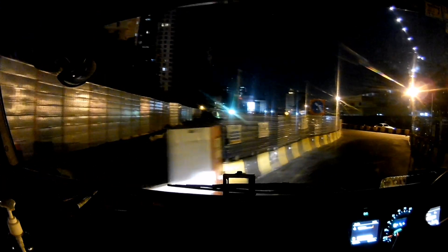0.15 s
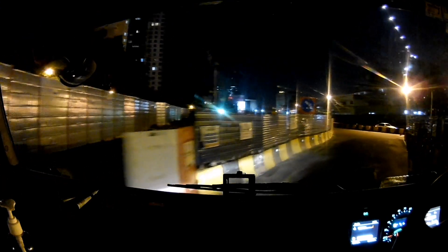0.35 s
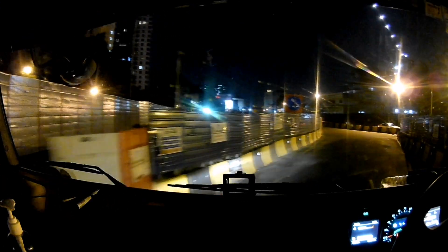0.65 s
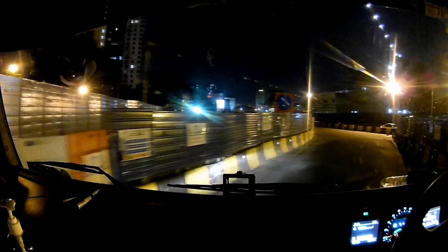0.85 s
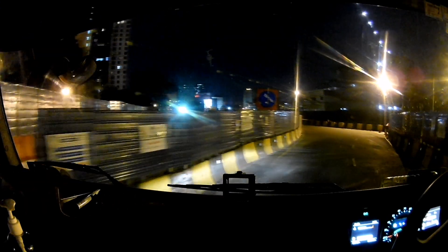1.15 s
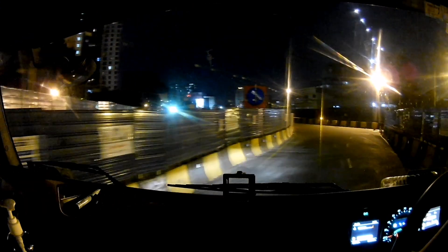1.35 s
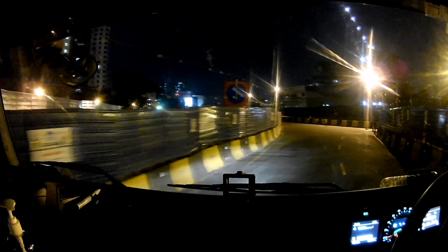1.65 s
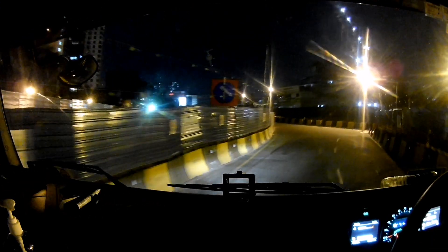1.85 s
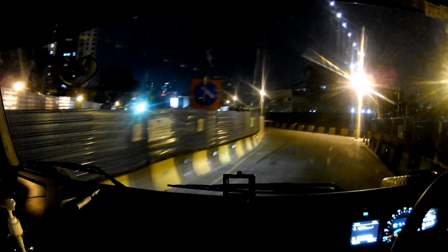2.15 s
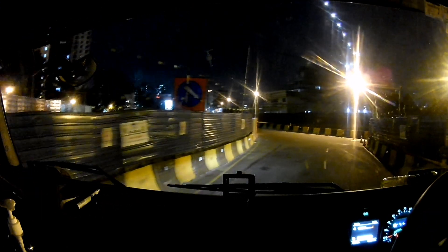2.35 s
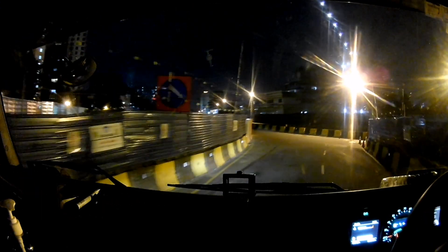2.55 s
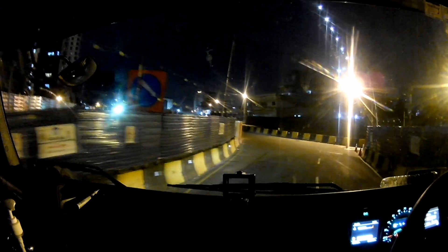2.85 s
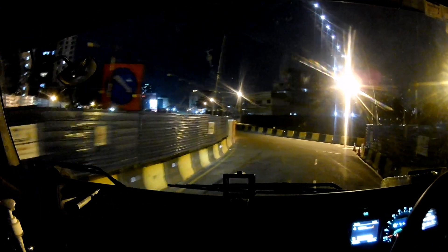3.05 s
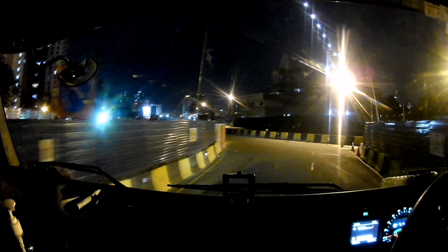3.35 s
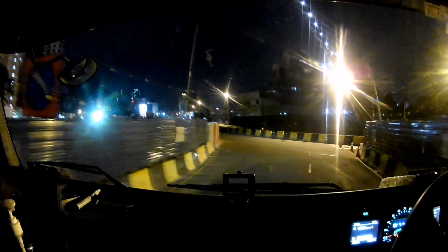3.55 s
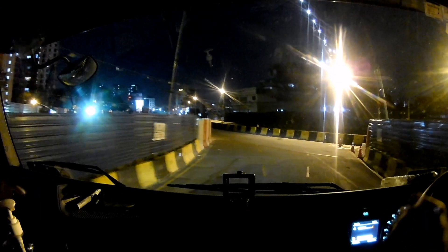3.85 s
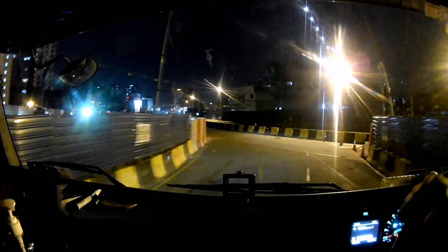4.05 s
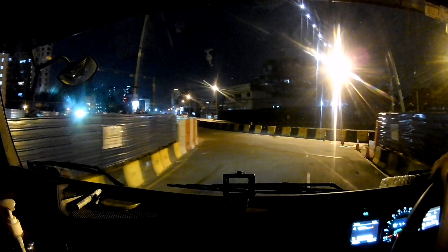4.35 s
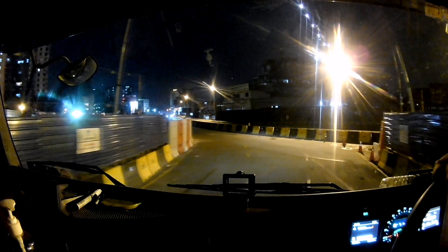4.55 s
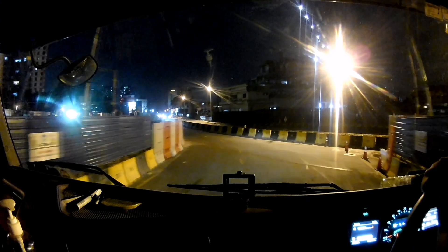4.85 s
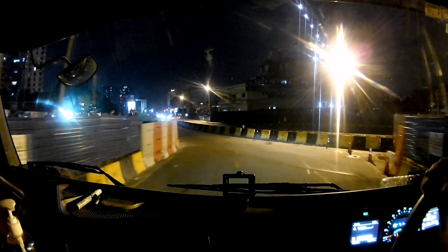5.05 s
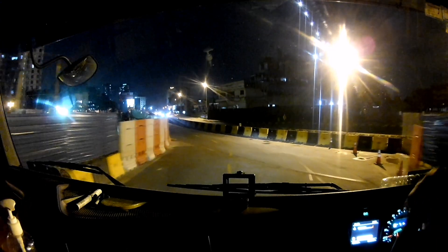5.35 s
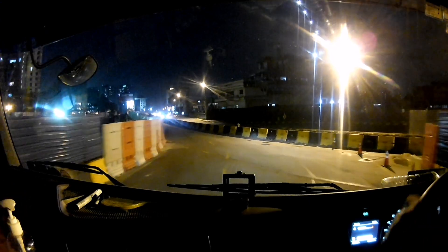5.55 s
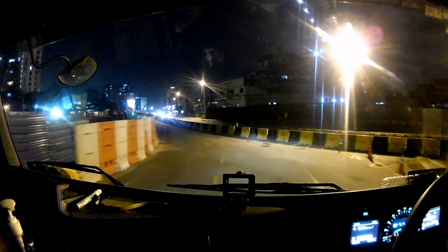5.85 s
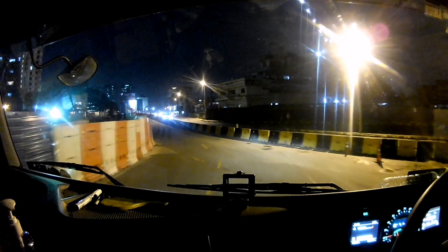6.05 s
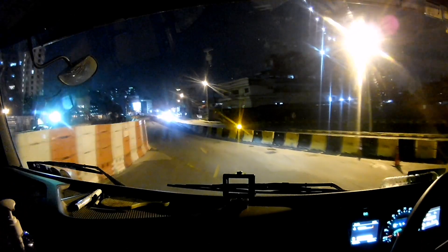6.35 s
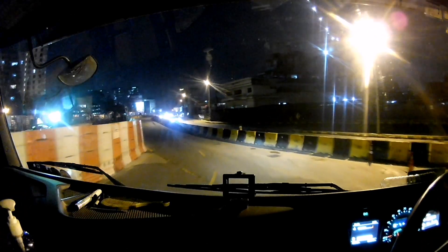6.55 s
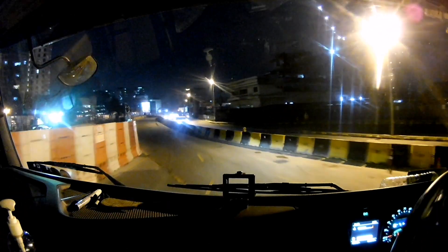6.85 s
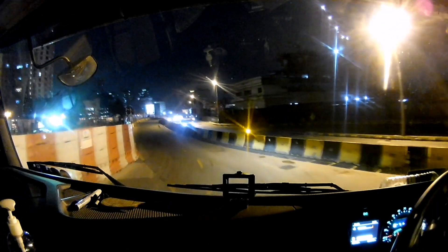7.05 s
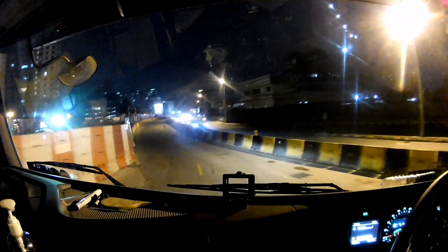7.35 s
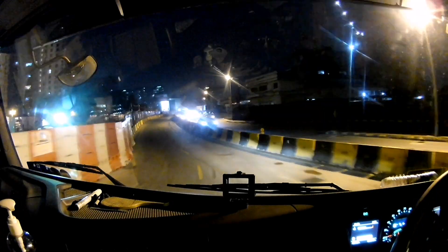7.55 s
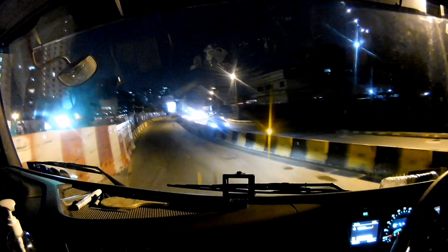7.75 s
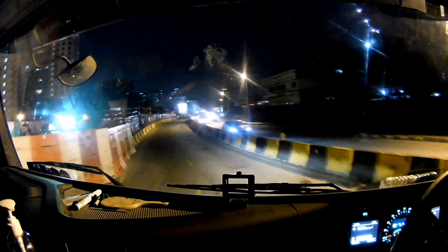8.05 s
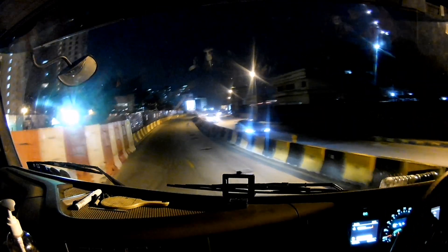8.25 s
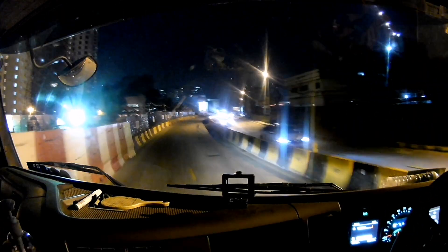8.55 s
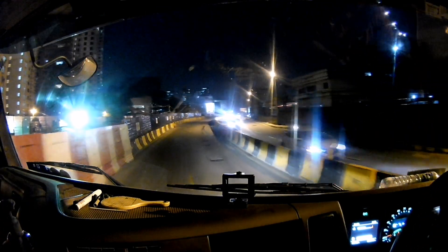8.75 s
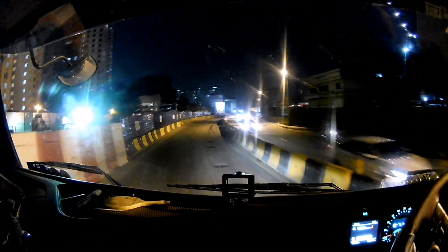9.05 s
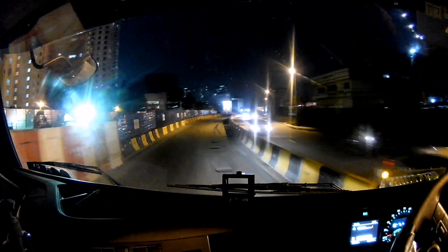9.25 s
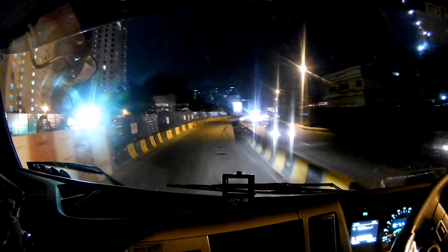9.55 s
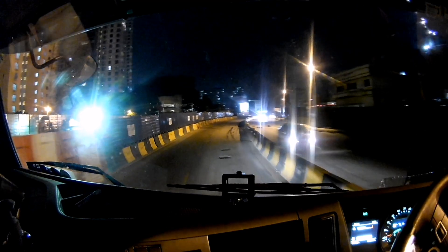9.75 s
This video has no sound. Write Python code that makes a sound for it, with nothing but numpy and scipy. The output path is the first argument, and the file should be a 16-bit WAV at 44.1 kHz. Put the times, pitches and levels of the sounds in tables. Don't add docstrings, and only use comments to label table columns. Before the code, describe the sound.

Inside a heavy truck's cab on a night road, a small dull dash microphone picks up a deep diesel drone. At first the load is light and the low boom falters; a thin, high belt squeak slips by around 0.6-0.8 seconds. From about 1 second the engine pulls harder, its roar, knock and valve clatter growing to their fullest around 2-4 seconds. A low cab heave comes near 2.8 and a floor thud at 3.1. A faint air hiss bursts around 3.5, then a loud dry knock at 4.0. Panels buzz in short spells, notably around 5.2 and 6.4. The boom flutters between 5.4 and 6.5, while pitch keeps slowly rising. Load eases near 7, with another strong bump, then partly recovers around 8. Trim rattles at 8.0 and taps dully at 9.6. Floor rumble and slight electronic hiss continue to the end.

```python
import sys
import numpy as np
from scipy import signal
from scipy.fft import rfft, irfft, next_fast_len
from scipy.io import wavfile
from scipy.ndimage import uniform_filter1d, map_coordinates

SR = 44100
rng = np.random.default_rng(int(sys.argv[2]) if len(sys.argv) > 2 else 0)


def to_linear_factor(level_db):
    exponent = np.asarray(level_db, float) / 20
    return 10 ** exponent


def store_pcm(level_fs):
    pcm = np.round(np.clip(level_fs, -1, 1) * 32767).astype(np.int16)
    wavfile.write(sys.argv[1], SR, np.atleast_2d(pcm).T)


N = 436590
TIME = np.arange(N) / SR

# [t/s, f/Hz, level/dB]
FIRING = [(0, 52.3, -35.5), (.5, 53.07, -40), (.72, 54.2, -35), (.88, 54.58, -29), (1.96, 54.7, -27),
          (2.95, 55.6, -22), (3.03, 55.9, -28.5), (3.45, 55.8, -23.5), (3.91, 55.67, -22.5),
          (4.0, 55.8, -29), (4.57, 57.43, -25), (4.75, 57.94, -32), (5.6, 59.6, -31), (6.5, 61.16, -29.5),
          (7.06, 62.46, -27), (7.4, 62.96, -28), (8.6, 65.33, -28.5), (9.9, 66.06, -29)]
# [t/s, load/dB]
LOAD = [(0, -14), (.58, -11.5), (.91, -11), (1.15, -5.5), (1.43, -7), (1.7, -5.5), (2.12, -0.6),
        (3.03, 1.2), (3.3, 0), (3.6, 0.2), (5.0, -2.5), (5.3, -1.5), (6.65, -4.5), (6.92, -8), (7.9, -6),
        (8.16, -4), (9.21, -6.5), (9.9, -5.5)]


def unit(x):
    return x / np.sqrt(np.mean(x ** 2) + 1e-20)


def along(points, hz):
    f, v = np.transpose(points)
    return np.interp(np.log(hz + 1), np.log(f + 1), v)


def curves(rows):
    s, *cols = np.transpose(rows)
    return [np.interp(TIME, s, c) for c in cols]


def wobble(rate):
    return map_coordinates(rng.standard_normal(400), [TIME * rate])


def filtered(x, response):
    m = next_fast_len(N + 8192)
    hz = np.fft.rfftfreq(m, 1 / SR)
    return irfft(rfft(x, m) * response(hz), m)[:N]


def peak(hz, centre_hz, width_hz):
    damping = 1j * hz * width_hz
    return damping / (centre_hz ** 2 - hz ** 2 + damping)


def rush(spectrum, patchy_db, gate=1):
    z = signal.stft(rng.standard_normal(N) * gate, nperseg=1024)[2]
    field = uniform_filter1d(rng.standard_normal(z.shape), size=4, axis=0)
    field = uniform_filter1d(field, size=12, axis=1)
    x = signal.istft(z * to_linear_factor(patchy_db * unit(field)), nperseg=1024)[1][:N]
    return unit(filtered(x, lambda hz: to_linear_factor(along(spectrum, hz))))


def swells(events, rest_db, rise, fall):
    gain = to_linear_factor(rest_db)
    for s, db in events:
        slope = np.where(TIME < s, rise, fall)
        gain = gain + to_linear_factor(db - slope * np.abs(TIME - s))
    return gain


def road():
    # [f/Hz, width/Hz, level/dB]
    mounts = [
        (14, 1.8, 3.5),
        (20, 2.2, -13),
    ]
    # [f/Hz, level/dB per Hz]
    floor = [(14, -38), (24, -10.5), (31, -4.5), (39, -4.5), (50, -4.5), (65, -11), (110, -100)]
    # [t/s, level/dB]
    bumps = [(.13, -37), (1.52, -45), (1.96, -31), (2.84, -19.5), (3.39, -27.5), (3.69, -37.5),
             (4.44, -27.5), (4.68, -35), (5.29, -27.5), (6.15, -35), (6.8, -34), (7.06, -20), (7.72, -26.5),
             (8.0, -30), (8.38, -36), (9.2, -32), (9.65, -38)]
    # [t/s, level/dB]
    joints = [(.13, -42), (1.52, -37), (2.67, -34), (3.06, -25), (3.65, -27.5), (4.02, -40), (4.57, -36),
              (5.21, -31.5), (6.12, -30), (6.76, -33.5), (6.97, -39), (7.25, -32.5), (7.66, -39),
              (8.85, -38.5), (9.23, -46.5)]

    def sway(hz):
        return sum(to_linear_factor(db) * peak(hz, centre, width) ** 2 for centre, width, db in mounts)

    bounce = unit(filtered(rng.standard_normal(N), sway))
    bounce *= swells(bumps, rest_db=-47, rise=90, fall=53)
    rumble = rush(floor, patchy_db=-1.2)
    rumble *= swells(joints, rest_db=-46.5, rise=120, fall=110)
    return bounce + rumble


def panels():
    # [mid t/s, half length/s, f/Hz, width/Hz, level/dB]
    buzzes = [(0.29, 0.72, 39, 1.3, -40.5), (.6, 1, 30.9, 2.7, -50), (0.46, .3, 2100, 68, -66),
              (8.9, 1, 2750, 90, -65.5), (.5, .6, 2850, 60, -73.5), (.3, .5, 260, 57, -48.5),
              (8.85, 0.092, 135, 25, -36.5), (6.4, 0.33, 900, 60, -43.5), (2.2, 0.31, 320, 30, -44),
              (1.253, 0.052, 3520, 200, -62), (1.71, 0.11, 1210, 51, -45), (2.38, 0.088, 890, 40, -42),
              (3.14, 0.75, 1080, 17, -45.5), (3.7, 0.18, 1930, 32, -52.5), (4.45, 0.1, 1250, 110, -42),
              (4.7, 0.18, 1200, 17, -45), (5.23, 0.4, 1055, 48, -39.5), (5.646, 0.048, 1100, 12, -43),
              (1.8, .3, 2000, 900, -53), (6.55, .25, 1950, 150, -52), (5.396, 0.15, 1920, 120, -49.5),
              (8.21, 0.054, 980, 90, -40.5), (3.61, 1.4, 4100, 340, -62)]
    out = np.zeros(N)
    for mid, half, centre_hz, width_hz, db in buzzes:
        ring = unit(filtered(rng.standard_normal(N), lambda hz: peak(hz, centre_hz, width_hz) ** 2))
        out += to_linear_factor(db) * np.exp(-((TIME - mid) / half) ** 2) * ring
    return out


def trim():
    # [t/s, level/dB, f/Hz, width/Hz, length/s]
    ticks = [
        (.261, -60, 4800, 1700, .012),
        (3.9635, -29, 1100, 800, .004),
        (7.955, -43, 2300, 2200, .02),
        (7.953, -51, 4700, 1800, .02),
        (8.812, -58, 4400, 2500, .008),
        (9.648, -59, 4600, 3000, .015),
        (9.646, -40, 900, 1200, .018),
             (1.375, -57, 6200, 1800, .005),
        (3.23, -76, 10000, 3500, .003),
        (3.249, -71, 10500, 4500, .004),
        (8.99, -76, 11500, 2000, .004),
        (7.956, -89, 10000, 4000, .014),
        (9.652, -82, 10500, 2500, .012),
    ]
    out = np.zeros(N)
    for s, db, centre_hz, width_hz, length in ticks:
        age = np.maximum(TIME - s, 0) / length
        burst = (age > 0) * np.exp(-age ** 2) * rng.standard_normal(N)
        tick = filtered(burst, lambda hz: peak(hz, centre_hz, width_hz) ** 3)
        out += to_linear_factor(db) * np.sqrt(SR / width_hz) * tick
    return out


def squeak():
    swell_db = -67.5 + 22 * (TIME - .75) + 4.5 * wobble(30)
    window = np.exp(-((TIME - .67) / .15) ** 6)
    return to_linear_factor(swell_db) * window * np.sin(2 * np.pi * 3490 * TIME + 1.5 * wobble(30))


def valve():
    # [t/s, level/dB]
    release = [
        (3.43, -100),
        (3.46, -76),
        (3.56, -72.5),
        (3.68, -76),
        (3.78, -82),
        (3.92, -98),
    ]
    # [f/Hz, level/dB per Hz]
    air = [(1500, -38), (3000, 22.5), (4200, 23), (6500, 12), (7400, 3), (8000, 6), (8500, 6.5),
           (10000, -4.5), (11800, 1), (12700, -4), (13500, -12), (15700, -23)]
    s, db = np.transpose(release)
    burst = filtered(rng.standard_normal(N), lambda hz: to_linear_factor(along(air, hz)))
    top = filtered(burst, lambda hz: (hz > 9000) & (hz < 13000))
    return to_linear_factor(np.interp(TIME, s, db, -150, -150)) * burst / np.std(top)


def firing_phase():
    return 2 * np.pi * np.cumsum(curves(FIRING)[0]) / SR


def flutter():
    phase = firing_phase()
    return to_linear_factor(-44) * (wobble(12) * np.sin(phase) + wobble(12) * np.cos(phase))


def block_noise():
    # [f/Hz, level/dB per Hz]
    roar = [(20, -63), (45, -10), (90, 2.5), (160, -1.5), (250, -2.5), (300, -3.5), (380, -7.5), (490, -4),
            (650, -6), (730, -10.5), (950, -27.5), (1600, -120)]
    knock = [(430, -26), (730, -7), (761, -7), (822, 1), (917, -2), (1070, 0.5), (1130, -2.5), (1320, -2.5),
             (1480, -13), (1920, -37.5), (3260, -120)]
    clatter = [(870, -25), (1480, -2), (1640, 0.5), (1820, -4.5), (1980, -2), (2100, -6), (2780, -13),
               (3150, -20.5), (4100, -46.5), (6930, -120)]
    rattle = [(2400, -15.5), (3150, -2.5), (3600, 3), (3900, 2), (4160, 3.5), (4800, -1), (5900, 1.5),
              (6500, -3.5), (7000, -12), (7500, -17.5), (7900, -29.5), (8300, -65), (9000, -120)]
    load_db = curves(LOAD)[0]
    phase = firing_phase()
    shake = wobble(16)
    beat = to_linear_factor(0.51 * np.cos(phase) + 0.48 * np.cos(phase / 3) + .7 * shake)
    loose = beat * to_linear_factor(0.49 * wobble(25))
    block = to_linear_factor(-35.5 + 0.28 * load_db) * rush(roar, patchy_db=0.0)
    block += to_linear_factor(-36.5 + 0.61 * load_db) * rush(knock, patchy_db=1.7, gate=to_linear_factor(0.47 * np.cos(phase)))
    block += to_linear_factor(-44.5 + 0.73 * load_db) * rush(clatter, patchy_db=1.7, gate=beat)
    block += to_linear_factor(-55 + 0.98 * load_db) * rush(rattle, patchy_db=-1.2, gate=loose)
    return block


def firing_tones():
    # [t/s, loss/dB]
    chokes = [(.27, 14), (.57, 14), (.66, 12), (1.13, 6), (1.24, 5), (1.38, 4), (4.91, 3.5), (5.46, 8),
              (5.62, 12), (5.68, 18), (5.98, 12), (6.09, 8), (6.17, 14), (6.22, 14), (6.37, 6), (6.48, 2),
              (6.89, 8), (7.05, -3.5), (7.09, -3), (7.28, 2)]
    # [f/Hz, level/dB]
    cab = [(105, -51), (111, -41), (115, -37), (125, -40.5), (131, -44), (165, -57), (178, -52.5),
           (196, -45)]
    # [multiple of firing rate, level/dB]
    uneven = [(.333, -42), (.5, -50), (.667, -50), (1.667, -52), (2.667, -55), (4, -51), (4.333, -51),
              (5, -52), (5.333, -53), (7, -55), (8, -54), (9, -55)]
    rate_hz, fire_db = curves(FIRING)
    load_db = curves(LOAD)[0]
    phase = firing_phase()
    choke_s = .025
    chokes_db = sum(db * np.exp(-((TIME - s) / choke_s) ** 2) for s, db in chokes)
    tones = to_linear_factor(fire_db - chokes_db) * np.sin(phase)
    for k in (2, 3):
        gain = to_linear_factor(along(cab, k * rate_hz) + 2 * wobble(11))
        tones += gain * np.sin(k * phase + .4 * wobble(9))
    for k, db in uneven:
        pull_db = (k > 2) * .2 * load_db
        gain = to_linear_factor(db + pull_db + 4 * wobble(2))
        tones += gain * np.sin(k * phase + .6 * wobble(4))
    return np.sqrt(2) * tones


def engine():
    return firing_tones() + block_noise()


def scene():
    return (road() + panels() + trim() + squeak() + valve() + flutter() + engine())[None]


def band_limit(x):
    return signal.sosfilt(signal.butter(12, 15740, fs=SR, output="sos"), x)


def record(dry):
    # [f/Hz, level/dB]
    edge = [
        (6800, 0),
        (7600, 0.5),
        (8000, -22.5),
        (8350, -4.5),
        (9500, 2),
    ]
    # [f/Hz, level/dB]
    mirror = [(6000, -120), (8000, -24), (8350, 0), (9100, -16), (10000, -31), (11300, -27), (11800, -32),
              (13000, -52), (15000, -80)]
    # [f/Hz, level/dB per Hz]
    circuit = [(4000, -60), (6500, -2), (8000, -.5), (9000, -1), (12000, 0), (16500, 1)]
    fade_in = np.minimum(TIME * 200, 1)
    inner = filtered(dry[0] * fade_in, lambda hz: to_linear_factor(along(edge, hz)))
    folded = 2 * inner * np.cos(2 * np.pi * 16000 * TIME)
    image = filtered(folded, lambda hz: to_linear_factor(along(mirror, hz)))
    hiss = to_linear_factor(-79) * rush(circuit, patchy_db=.2)
    return band_limit((inner + image + hiss)[None])


dry = scene()
out = record(dry)
store_pcm(out)
```